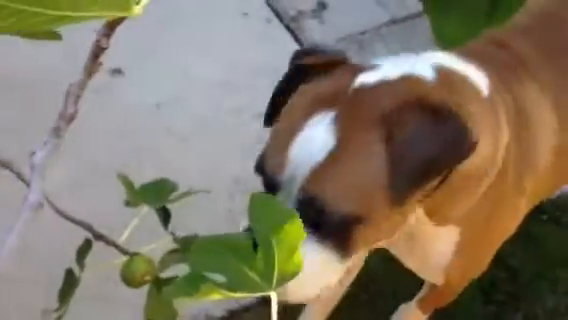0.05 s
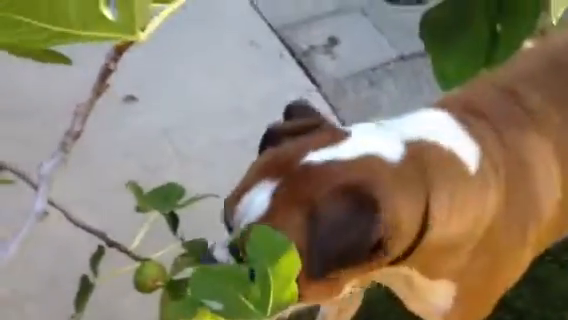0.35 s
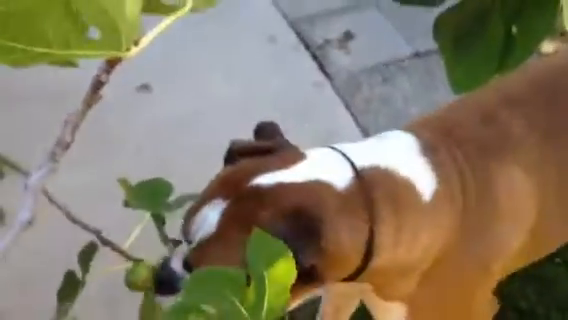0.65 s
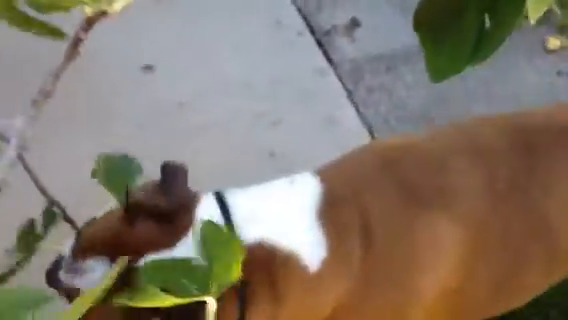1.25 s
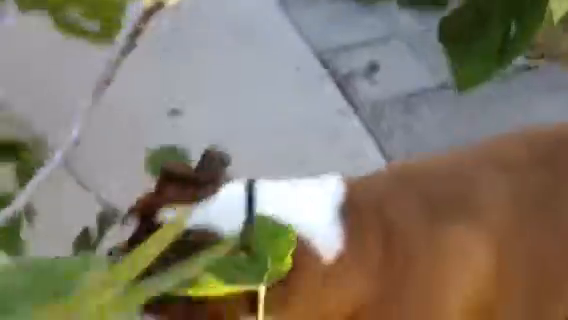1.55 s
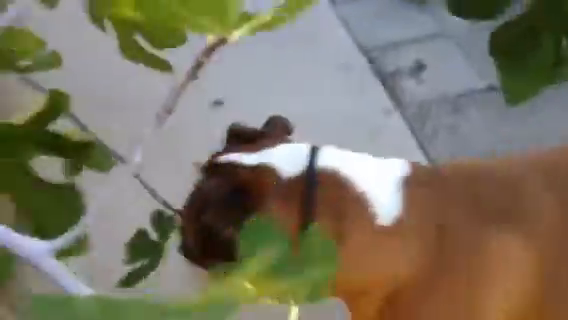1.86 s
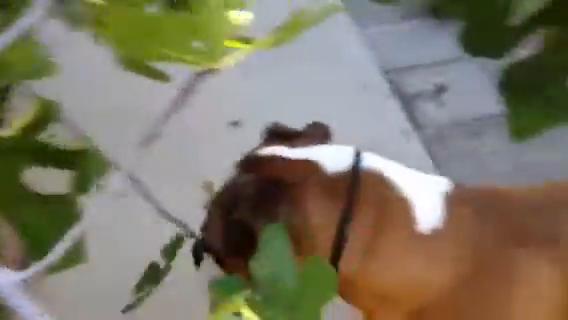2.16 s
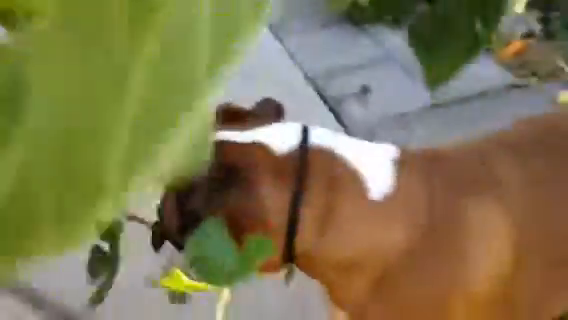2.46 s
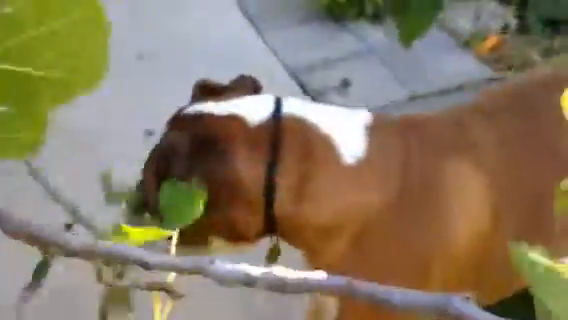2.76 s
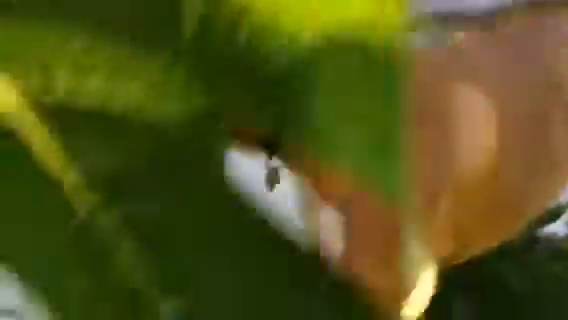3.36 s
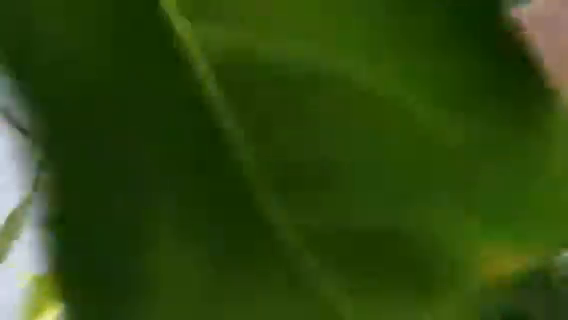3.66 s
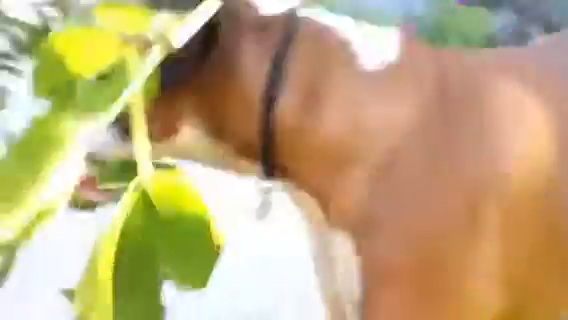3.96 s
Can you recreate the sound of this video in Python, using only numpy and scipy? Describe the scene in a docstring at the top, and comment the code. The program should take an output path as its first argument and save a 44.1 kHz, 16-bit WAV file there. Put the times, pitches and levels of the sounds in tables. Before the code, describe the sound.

In a quiet yard, a dog's faint sniffs and lip smacks lead to one short snort. A branch rustles and ticks until a twig snaps, and a leaf loudly crunches and scrapes over the microphone with dull thuds.

```python
"""Dog at a fig branch

In a quiet yard a dog sniffs, smacks its lips, snorts and tugs softly at the leaves. Its breath is
turbulence in the resonances of the nose; the branch rustles and ticks, and a twig snaps. Then a big
rough leaf buckles against the microphone in stick-slip clicks, bumps it and rasps across it."""
import sys
import numpy as np
from scipy import signal
from scipy.fft import rfft, irfft
from scipy.io import wavfile
from scipy.ndimage import uniform_filter1d

SR = 44100
rng = np.random.default_rng(int(sys.argv[2]) if len(sys.argv) > 2 else 0)


def store_pcm(level_fs):
    """Save levels as 16-bit WAV."""
    pcm = np.round(np.clip(level_fs, -1, 1) * 32767).astype(np.int16)
    wavfile.write(sys.argv[1], SR, np.atleast_2d(pcm).T)


N = 176400
T = np.arange(N) / SR

# the leaf blade rings as it buckles and slides: centre_hz, width_hz, level_db
BLADE_MODES = [(830, 110, -8), (1200, 146, 3), (1467, 31, -0.5), (1800, 79, 2.5), (2050, 88, 2.5),
               (2365, 120, -2), (2800, 59, 2), (3290, 63, -4), (3480, 130, 5), (4850, 230, -1),
               (5400, 470, -14), (6400, 710, -5), (8000, 810, -8), (10200, 700, -12)]


def from_db(db):
    """Decibels to gain."""
    return 10 ** (np.asarray(db) / 20)


def unit_power(x):
    """Scale to an RMS of 1."""
    return x / np.sqrt(np.mean(x ** 2) + 1e-20)


def envelope(rows):
    """Smoothed gain along (time_s, level_db) points, silent outside them."""
    s, db = np.transpose(rows)
    return uniform_filter1d(from_db(np.interp(T, s, db)) * (T >= s[0]) * (T <= s[-1]), size=64)


def blend(strokes, dull, bright):
    """Play a dull and a bright sound along their two level columns, stroke by stroke."""
    return sum(envelope([(s, db) for s, db, _ in rows]) * dull
               + envelope([(s, db) for s, _, db in rows]) * bright for rows in strokes)


def drift(rate_hz):
    """Smooth random wander with a spread of 1."""
    hop, settle = 40, 2000
    r = np.exp(-2 * np.pi * rate_hz * hop / SR)
    slow = signal.lfilter([1], [1, -2 * r, r * r], rng.standard_normal(N // hop + settle + 2))[settle:]
    return np.interp(np.arange(N) / hop, np.arange(len(slow)), unit_power(slow))


def colour(x, points):
    """EQ along (freq_hz, level_db) points, rolled off below the first, at unit power."""
    hz, db = np.transpose(points)
    f = np.maximum(np.arange(N // 2 + 1) * SR / N, 1)
    skirt = np.minimum(f / hz[0], 1) ** 2
    return unit_power(irfft(rfft(x) * skirt * from_db(np.interp(np.log(f), np.log(hz), db)), N))


def pass_band(x, kind, corner_hz):
    """Gentle low-pass or high-pass."""
    return signal.sosfilt(signal.butter(2, corner_hz, kind, fs=SR, output="sos"), x)


def grains(per_s, spread_db):
    """Random tiny clicks of uneven size, at unit power."""
    sizes = from_db(spread_db * np.minimum(rng.exponential(1, N), 4)) * rng.choice([-1, 1], N)
    return unit_power(sizes * (rng.random(N) < per_s / SR))


def click(start_s):
    """One unit click."""
    return 1. * (np.arange(N) == int(start_s * SR))


def ring(clicks, hz, t60_s):
    """A unit click sets a sine of height 1 ringing."""
    r, w = from_db(-60 / (t60_s * SR)), 2 * np.pi * hz / SR
    return signal.lfilter([0, np.sin(w)], [1, -2 * r * np.cos(w), r * r], clicks + 1e-18)


def resonate(x, hz, width_hz):
    """One resonance, gain 1 at its peak."""
    r, w = np.exp(-np.pi * width_hz / SR), 2 * np.pi * hz / SR
    return signal.lfilter(np.array([1, 0, -1]) * (1 - r * r) / 2, [1, -2 * r * np.cos(w), r * r], x)


def airflow(peaks, flutter_db):
    """Fluttering turbulence through parallel resonances."""
    air = sum(from_db(db) * resonate(rng.standard_normal(N), hz, width) for hz, width, db in peaks)
    return unit_power(air * from_db(flutter_db * drift(40)))


def yard():
    """A bed of distant outdoor rumble and even hiss."""
    # swell of the rumble: time_s, relative_db
    swell = [(0, -0.5), (.9, 1.5), (1.7, 1), (2.0, -2), (2.3, -0.5), (2.9, -0.5), (3.3, -2), (4.0, 7)]
    # spectra of the rumble and the hiss: freq_hz, level_db
    rumble_eq = [(28, -45), (42, -1.5), (60, 3), (110, -2.5), (210, -2), (310, -10.5), (500, -14),
                 (900, -26), (2000, -30.5)]
    hiss_eq = [(400, -1.5), (1300, -0.5), (2200, -4), (2800, -8.5), (3500, -5.5), (5000, -7), (8000, -10),
               (12000, -11.5), (15000, -11.5)]
    rumble = envelope(swell) * colour(rng.standard_normal(N), rumble_eq) * from_db(.8 * drift(17))
    hiss = colour(rng.standard_normal(N), hiss_eq)
    return from_db(-60.5) * rumble + from_db(-67.5) * hiss


def branch_rustle():
    """The branch stirs with a faint, grainy rustle while the dog tugs."""
    # stirring of the branch: time_s, relative_db
    stir = [(0, -66.5), (.07, -60.5), (.15, -68.5), (.33, -71), (.385, -66), (.44, -72), (1.9, -63),
            (2.03, -66.5), (2.11, -64), (2.24, -64), (2.32, -69.5), (2.46, -67), (2.53, -60), (2.63, -63),
            (2.72, -67), (2.77, -60.5), (2.95, -60), (3.15, -65), (3.35, -62), (3.43, -62), (3.54, -65),
            (3.6, -57)]
    # spectrum of the rustle: freq_hz, level_db
    rustle_eq = [(470, 8), (900, -1.5), (1300, -2.5), (2300, 3.5), (2800, -3), (3600, 2), (5000, -1),
                 (6500, -3), (9000, -7.5), (15000, -12)]
    rustle = grains(per_s=3000, spread_db=1.5) * from_db(2 * drift(18))
    return from_db(-3) * envelope(stir) * colour(rustle, rustle_eq)


def microphone_bumps():
    """Low, damped thuds, and the rumble of the phone's case rubbed by the leaf."""
    # soft knocks on the microphone: start_s, relative_db, pitch_hz, t60_s
    thuds = [(0.141, -46.5, 138, .05), (1.385, -47.5, 90, 0.048), (1.859, -32.5, 62, 0.054),
             (3.039, -47.5, 108, 0.07), (3.419, -45.5, 75, 0.059), (3.498, -41.5, 81, 0.036),
             (3.685, -29, 130, 0.033), (3.702, -29, 87, .05), (3.7347, -23, 156, .035),
             (3.739, -36, 65, 0.062), (3.775, -16, 174, 0.013), (3.797, -30, 200, 0.016),
             (3.842, -29, 160, 0.022), (3.864, -29.5, 85, 0.04), (3.939, -26, 175, 0.031),
             (3.946, -23.5, 156, 0.037), (3.957, -18.5, 286, 0.0098)]
    # rubbing on the case: time_s, level_db
    rubbing = [(3.62, -59), (3.675, -54), (3.70, -50), (3.735, -36), (3.755, -57), (3.78, -46), (3.82, -42),
               (3.865, -36), (3.90, -75), (3.95, -42), (3.97, -45), (4.0, -53)]
    # spectrum of the rubbed case: freq_hz, level_db
    case_eq = [(30, -29), (70, -8), (170, 0.5), (330, -10), (700, -11.5), (1500, -35.5)]
    attack_s = .0027
    out = envelope(rubbing) * colour(rng.standard_normal(N), case_eq)
    for s, db, hz, t60 in thuds:
        onset = 1 - np.exp(-np.maximum(T - s, 0) / attack_s)
        out += from_db(db + 4) * ring(click(s), hz, t60) * onset
    return out


def twig_ticks():
    """Each tick is a brief crack of noise that rings in the twig; the loudest is the snap."""
    # ticks of leaves and twigs: start_s, relative_db
    ticks = [(0.266, -44.5), (0.673, -43), (0.718, -38.5), (0.844, -38), (0.986, -45), (1.254, -47),
             (2.091, -46), (2.231, -50), (2.540, -43), (2.595, -49.5), (2.752, -42.5), (2.871, -41),
             (2.88, -54.5), (3.05, -46.5), (3.394, -26), (3.618, -39)]
    # modes of the twig: pitch_hz, level_db, t60_s
    twig_modes = [(1200, -4, 0.02), (1870, -4, 0.038), (2380, 1, 0.04), (3200, 0, 0.042),
                  (4030, 3.5, 0.014), (5000, -2, 0.046), (5800, -5, 0.014), (6400, 2, 0.0099),
                  (7600, -16, 0.015), (11500, -16, .015)]
    crack_decay_s = .0026
    start_s, db = np.transpose(ticks)
    at, hits = (start_s * SR).astype(int), np.zeros(N)
    hits[at] = from_db(db)
    bursts = signal.lfilter([1], [1, -np.exp(-1 / (crack_decay_s * SR))], hits + 1e-18)
    crack = bursts * colour(rng.standard_normal(N), [(900, -3.5), (6000, 4.5), (9000, -9), (15000, -17)])
    wood = 0
    for k, (hz, mode_db, t60) in enumerate(twig_modes):
        hits[at] = from_db(db + mode_db + rng.normal(0, 1.6, len(at)))  # each tick has its own timbre
        wood += (-1) ** k * ring(hits, hz, t60)
    return from_db(-19) * wood + from_db(-11) * crack


def sniffs():
    """Air drawn through the nose: a hollow rush in the passage, a hiss at the nostrils."""
    # one curve per run of sniffs: time_s, rush_db, hiss_db
    breaths = [
        [(.59, -72, -75), (.608, -56, -63), (.645, -63.5, -62.5), (.672, -51.5, -60), (.69, -61, -68),
         (.712, -64, -64), (.725, -52.5, -65), (.745, -61, -64), (.80, -63, -62.5), (.91, -58, -57.5),
         (.99, -59, -56), (1.105, -66, -61), (1.13, -78, -79)],
        [(1.29, -84, -78), (1.38, -66, -64), (1.46, -62, -69), (1.55, -66, -60.5), (1.63, -77, -71)],
    ]
    # resonances of the nasal passage and the nostrils: centre_hz, width_hz, level_db
    passage = [(1460, 1200, -4.5), (2190, 220, 0.5), (2450, 96, -1), (3520, 930, -12.5)]
    nostrils = [(3700, 810, -3), (4850, 1350, 4.5), (6070, 540, 0), (7650, 700, -6), (11000, 4700, -17)]
    return blend(breaths, airflow(passage, flutter_db=2.3), airflow(nostrils, flutter_db=1.7))


def lip_smacks():
    """Small clicks of lips and jaw on the branch ring in the hollow of the mouth."""
    # smacks: start_s, relative_db, pitch_hz, overtone_db
    smacks = [(0.849, -50, 595, -8), (.856, -50, 400, -9), (0.879, -49, 363, -12), (0.892, -44, 300, -14),
              (.906, -48, 346, -13), (.93, -60, 480, 7), (0.942, -49.5, 914, 2.5), (.9605, -47, 612, -5),
              (.966, -39, 632, -0.5)]
    # modes of the mouth cavity: pitch_ratio, level_db, t60_s
    mouth_modes = [(1, 4, 0.054), (1.55, 2, .025), (1.9, 3.5, 0.024), (3.5, -20, .03)]
    out = 0
    for s, db, hz, overtone_db in smacks:
        for k, (ratio, mode_db, t60) in enumerate(mouth_modes):
            gain = from_db(db + mode_db + overtone_db * (k > 0) - 4)
            out += (-1) ** k * gain * ring(click(s), hz * ratio, t60)
    return out


def coat_brushes():
    """Leaves brush the dog's coat in short, thin swishes that swell and fade."""
    # swishes: middle_s, half_length_s, level_db, centre_hz, width_hz
    swishes = [(0.982, 0.0039, -56, 3560, 300), (1.555, 0.041, -63.5, 11800, 4000),
               (1.748, 0.047, -63, 11000, 4000), (2.135, 0.05, -66.5, 4570, 600),
               (2.15, 0.065, -71, 8240, 2000), (2.671, .012, -66, 3170, 600),
               (2.874, 0.013, -63.5, 11000, 5000)]
    hairs = grains(per_s=9000, spread_db=4)
    return sum(from_db(db) * np.exp(-((T - s) / half) ** 2) * unit_power(resonate(hairs, hz, width))
               for s, half, db, hz, width in swishes)


def snort():
    """A blast of air through the nose swells, flaps twice and stops short."""
    # the blast: time_s, level_db
    blast = [(1.63, -75), (1.668, -57), (1.74, -56), (1.78, -52), (1.815, -52), (1.826, -43.5),
             (1.835, -45), (1.845, -40), (1.855, -57), (1.875, -65.5)]
    # resonances of the snort: centre_hz, width_hz, level_db
    formants = [(480, 110, -4), (1900, 990, -5), (3350, 310, -0.5), (3930, 780, -1), (5150, 490, -6),
                (6600, 1500, -8.5), (11500, 2500, -18.5)]
    return envelope(blast) * airflow(formants, flutter_db=2)


def leaf_crumples():
    """Each buckle is a short volley of stick-slip clicks that rings the fold and the whole blade."""
    # the leaf buckles on the microphone: start_s, length_s, relative_db, lowpass_hz, fold_hz
    buckles = [(3.6355, 0.0021, -36.5, 13000, 3890), (3.638, .003, -37.5, 4000, 2460),
               (3.6424, .0015, -36.5, 12000, 6400), (3.652, 0.0024, -36.5, 11000, 3900),
               (3.659, 0.0033, -42.5, 7000, 1200), (3.667, 0.017, -46, 8000, 900),
               (3.6837, 0.00081, -35, 9000, 6800), (3.6881, 0.0011, -32, 11000, 6140),
               (3.692, 0.0023, -30, 5000, 1550), (3.696, 0.011, -34.5, 6000, 3700),
               (3.704, 0.0074, -27.5, 2000, 1170), (3.713, 0.0125, -38.5, 4000, 1800),
               (3.724, 0.0097, -28.5, 6130, 1180), (3.767, 0.0075, -41, 1800, 6670),
               (3.841, 0.0058, -33, 1800, 1200), (3.914, 0.0066, -37, 1800, 3400),
               (3.946, 0.012, -36, 6960, 6200), (3.9563, 0.0013, -24.5, 8800, 5420),
               (3.959, 0.00095, -23, 7960, 2030), (3.984, 0.0032, -37, 4520, 3700)]
    # spectrum of the clicks: freq_hz, level_db
    slip_eq = [(150, 10.5), (500, -6), (850, -2.5), (1500, -3.5), (2400, 3), (3100, -2), (3900, 0),
               (6200, -3.5), (9000, -5.5), (15000, -7)]
    release_s = .0012
    slips = colour(grains(per_s=13000, spread_db=2.5), slip_eq)
    volleys = 0
    for s, length, db, lowpass_hz, fold_hz in buckles:
        gate = (T >= s) * np.exp(-np.clip((T - s - length) / release_s, 0, 40))
        crunch = unit_power(pass_band(slips, "low", lowpass_hz))
        fold = unit_power(resonate(slips, fold_hz, width_hz=160))
        volleys += from_db(db) * gate * (crunch + from_db(-7) * fold)
    blade = sum(from_db(db) * resonate(volleys, hz, width) for hz, width, db in BLADE_MODES)
    return from_db(-4.5) * (volleys + from_db(-8) * blade)


def leaf_slide():
    """Leaf hairs rasp on the case; the blade's resonances come and go as the contact shifts."""
    # the hairy skin slides past, one curve per stroke: time_s, scrape_db, hiss_db
    strokes = [
        [(3.735, -53, -56), (3.763, -62, -56), (3.769, -55, -54), (3.805, -52.5, -48), (3.83, -46.5, -47.5),
         (3.868, -41.5, -39), (3.90, -48, -38), (3.93, -54, -38), (3.949, -43, -37), (3.955, -47, -45),
         (3.962, -40, -52), (3.969, -52, -54)],
        [(3.970, -56, -53), (3.974, -53, -40.5), (3.986, -52, -37), (4.0, -60, -37)],
    ]
    # spectrum of the catching hairs: freq_hz, level_db
    hair_eq = [(200, -21), (500, 7.5), (900, -7), (1500, -2), (2600, -9), (4200, -2.5), (6500, 3),
               (8000, -13.5), (11000, -12), (15000, -26)]
    crossover_hz = 2400
    hairs = colour(grains(per_s=5500, spread_db=3.5), hair_eq)
    blade = sum(from_db(db + 3.4 * drift(43)) * resonate(grains(per_s=4000, spread_db=2), hz, width)
                for hz, width, db in BLADE_MODES)
    rasp = (from_db(-4) * hairs + from_db(-2) * unit_power(blade)) * from_db(1.6 * drift(140))
    scrape = unit_power(pass_band(rasp, "low", crossover_hz))
    hiss = unit_power(pass_band(rasp, "high", crossover_hz))
    return blend(strokes, scrape, -hiss)  # flipped so the bands do not cancel at the crossover


def scene():
    """Dog, branch, leaf and yard at one microphone."""
    dog = sniffs() + snort() + lip_smacks()
    branch = branch_rustle() + twig_ticks() + coat_brushes()
    leaf = leaf_crumples() + leaf_slide()
    return (dog + branch + leaf + microphone_bumps() + yard())[None]


def record(dry):
    """The microphone loses the deepest bass; the top is cut steeply."""
    low_cut_hz, high_cut_hz = 32.5, 15450
    thinned = pass_band(dry, "high", low_cut_hz)
    return signal.sosfilt(signal.ellip(12, .2, 80, high_cut_hz, fs=SR, output="sos"), thinned)


dry = scene()
out = record(dry)
store_pcm(out)
```